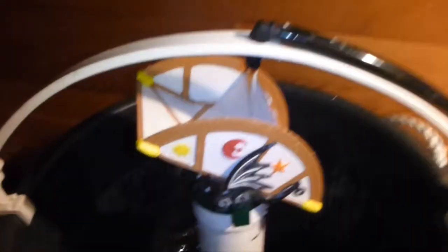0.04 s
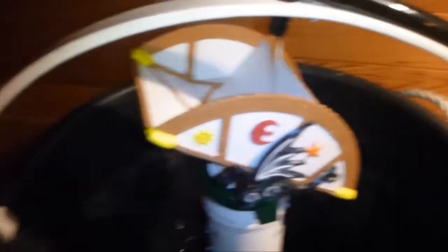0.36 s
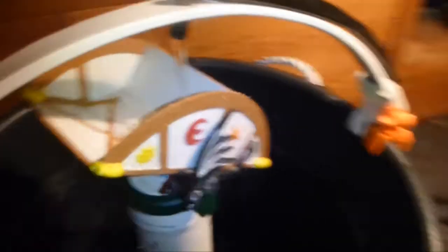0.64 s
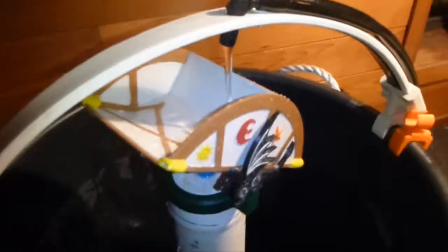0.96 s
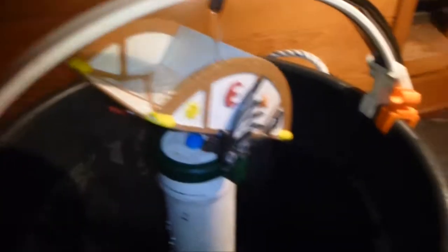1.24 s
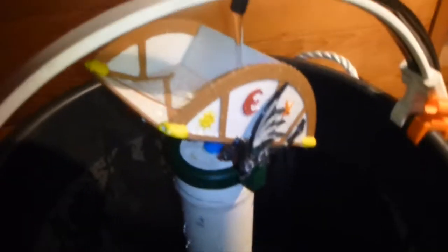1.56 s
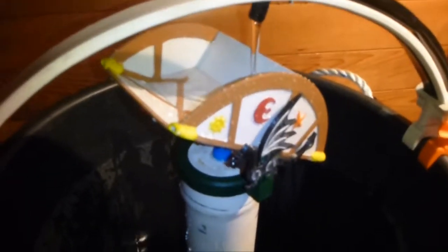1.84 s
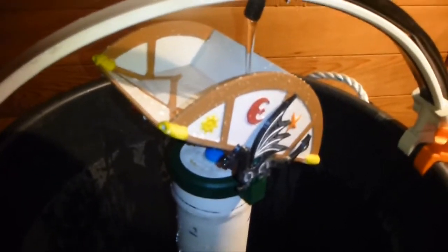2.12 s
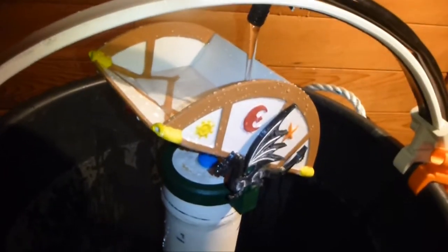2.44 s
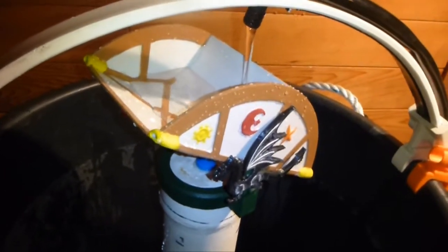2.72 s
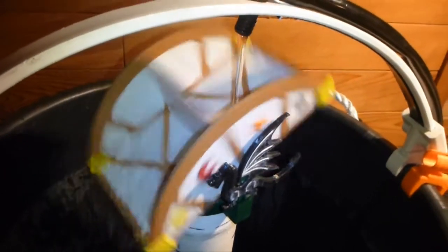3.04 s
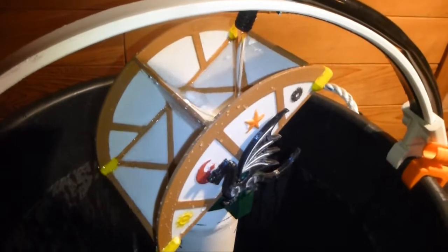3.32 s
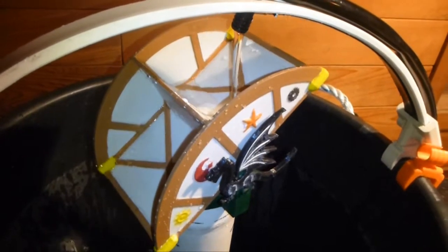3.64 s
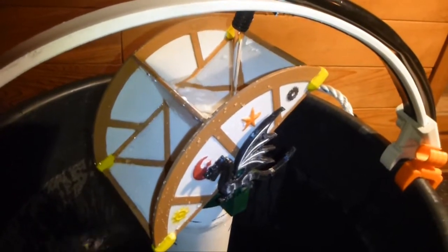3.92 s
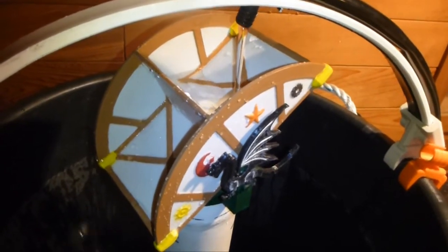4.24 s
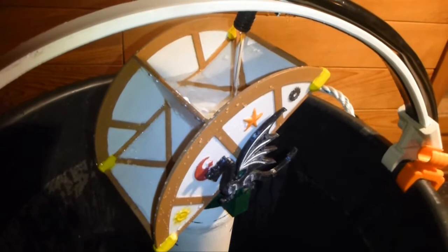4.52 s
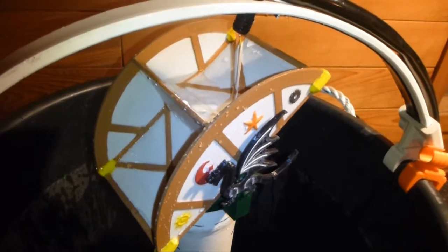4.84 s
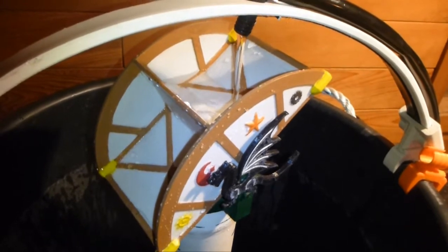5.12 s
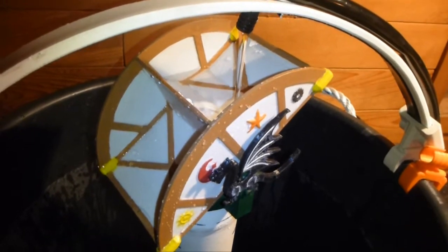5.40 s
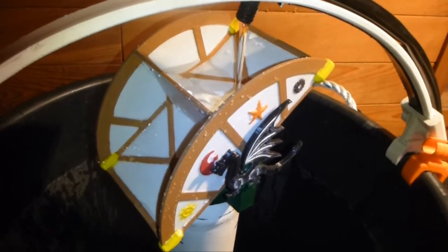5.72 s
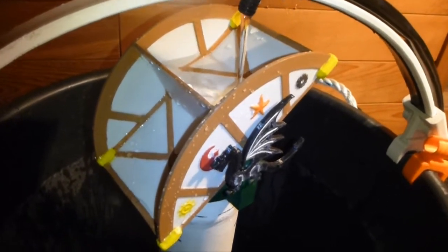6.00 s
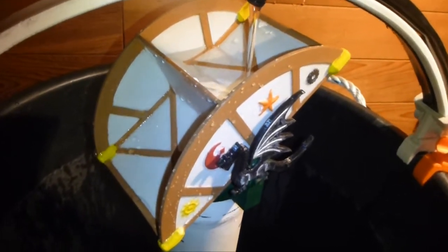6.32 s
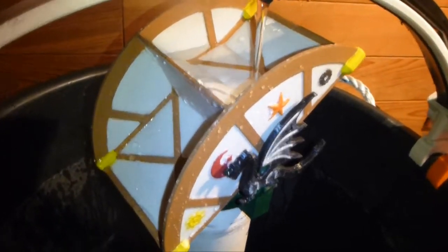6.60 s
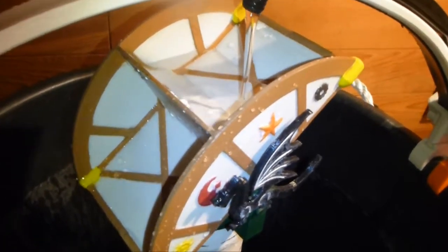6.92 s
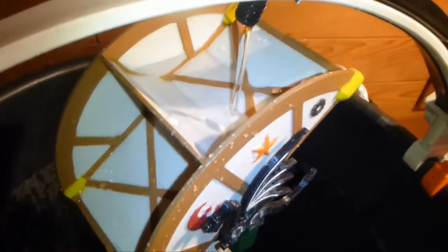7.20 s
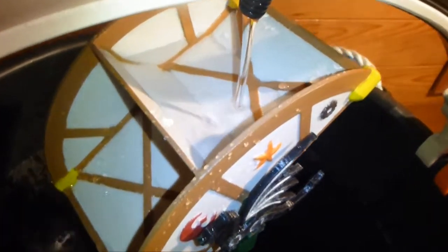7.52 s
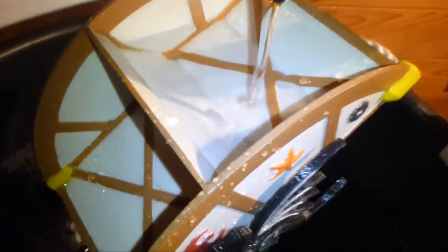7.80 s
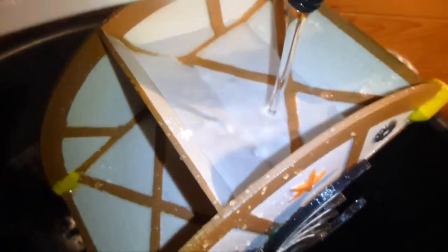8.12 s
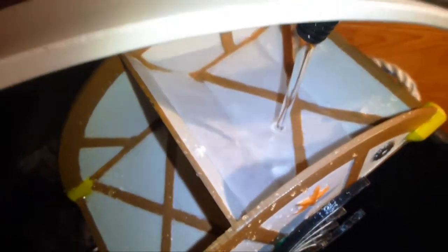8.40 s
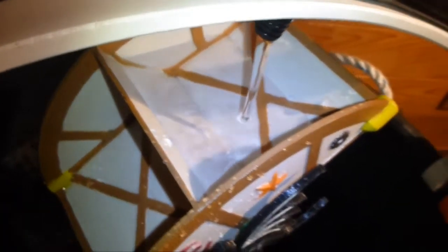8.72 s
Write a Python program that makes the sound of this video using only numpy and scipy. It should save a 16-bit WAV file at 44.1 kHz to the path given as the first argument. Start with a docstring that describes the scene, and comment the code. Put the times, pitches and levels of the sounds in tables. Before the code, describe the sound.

A steady, smooth hiss of room and microphone runs throughout. At about 0.8 seconds someone takes a soft step, and clothes rustle faintly until about 1.3 seconds. Two faint drips fall near 2 seconds. At about 3 seconds a plastic tipping bucket overbalances and hits its stop with one sharp clack, the loudest sound, with a very quick chatter and briefly ringing walls. The air in the big tub below gives a short, hollow boom at the same moment. From about 3.1 to 3.4 seconds the water plunges into the tub as a bright splash of spray and ringing bubbles. A few small drops and a fine patter follow, dying away by about 3.6 seconds. After that only the hiss remains until the end, near 9 seconds. Everything sounds close, with the short, dull reflections of a small wooden room.

```python
"""A steady, smooth hiss of room and microphone is heard first. Someone takes a step with a rustle of
clothes. At about 3 s a plastic tipping bucket above a big tub in a small wooden room overbalances and
clacks against its stop; its walls ring and the air in the tub booms. Its water plunges into the tub as
spray and ringing bubbles; a few drops follow."""
import sys
import numpy as np
from scipy import signal
from scipy.fft import rfft, irfft, next_fast_len
from scipy.io import wavfile
from scipy.ndimage import uniform_filter1d

SR = 44100
rng = np.random.default_rng(int(sys.argv[2]) if len(sys.argv) > 2 else 0)


def bounce(signal):
    """Save signal as a 16-bit WAV file at the path given by the first command-line argument."""
    frames = np.transpose(np.atleast_2d(signal))
    limited = np.clip(frames, -1, 1)
    pcm = np.round(limited * 32767).astype(np.int16)
    wavfile.write(sys.argv[1], SR, pcm)


N = 394694
TIME = np.arange(N) / SR
POUR_S = 3.231   # bulk of the water plunges in

# mid-pitched spectrum of the bubbles and the lead-in noise: (frequency [Hz], relative density [dB])
MID_SPECTRUM = [(100, -32), (200, -14), (380, -9), (550, -13), (900, 3.5), (1400, 2.5), (1850, 5.5),
                (2600, -5), (4500, -10), (9000, -45)]


def from_db(db):
    """Decibels to gain."""
    return 10 ** (np.asarray(db) / 20)


def rms_one(x):
    """Scale to unit rms."""
    return x / np.sqrt(np.mean(x ** 2) + 1e-20)


def coloured(x, spectrum):
    """Give a steady flat sound a spectrum; rms 1."""
    size = next_fast_len(N)
    hz, db = np.transpose(spectrum)
    bins_hz = np.maximum(np.arange(size // 2 + 1) * SR / size, 1)
    gain = from_db(np.interp(np.log(bins_hz), np.log(hz), db))
    gain /= 1 + (hz[0] / 2 / bins_hz) ** 2   # bass roll-off
    return rms_one(irfft(rfft(x, size) * gain, size)[:N])


def grains(per_s, spread_db):
    """Random tiny impacts of uneven size; rms 1."""
    sizes = from_db(spread_db * np.minimum(rng.exponential(1, N), 4)) * rng.choice([-1, 1], N)
    return rms_one(sizes * (rng.random(N) < per_s / SR))


def burst(start_s, rise_s, decay_s):
    """Envelope: linear rise to 1, exponential decay."""
    age = TIME - start_s
    return np.clip(age / rise_s, 0, 1) * np.exp(-np.clip((age - rise_s) / decay_s, 0, 20))


def swell(peak_s, rise_s, hold_s, decay_s):
    """Envelope: exponential rise to 1 at peak_s, hold, exponential decay."""
    age = TIME - peak_s
    return np.exp(-np.clip(np.maximum(-age / rise_s, (age - hold_s) / decay_s), 0, 20))


def around_clack():
    """Envelope: grows to 1 as the bucket hits its stop, then fades."""
    return swell(peak_s=3.056, rise_s=0.039, hold_s=0, decay_s=0.089)


def ring(x, hz, t60_s):
    """Resonator: a unit click rings as a sine of height 1."""
    radius, angle = np.exp(-np.log(1000) / (t60_s * SR)), 2 * np.pi * hz / SR
    return signal.lfilter([0, np.sin(angle)], [1, -2 * radius * np.cos(angle), radius ** 2], x + 1e-18)


def cloud(low_hz, high_hz, per_s, cycles, spread_db):
    """Many droplets or bubbles, each ringing briefly at one of 20 pitches; flat 2 s loop, rms 1."""
    pitches_hz = np.geomspace(low_hz, high_hz, num=20)
    hits = grains(per_s, spread_db)[:2 * SR]
    pitch_index = rng.integers(0, len(pitches_hz), 2 * SR)
    loop = sum(hz * ring(hits * (pitch_index == k), hz, cycles / hz) for k, hz in enumerate(pitches_hz))
    return np.resize(rms_one(loop), N)


def hiss(gain_db):
    """Steady, smooth noise of room and microphone."""
    # steady noise: (frequency [Hz], relative density [dB])
    spectrum = [(25, 7), (60, -10.5), (90, -12.5), (125, -6.5), (200, -3), (330, 2), (650, 1.5), (1000, -1),
                (2000, -6), (4000, -12), (7000, -17), (11000, -21), (15500, -23.5)]
    return from_db(gain_db) * coloured(rng.standard_normal(N), spectrum)


def room(x, t60_s, wet_db, cutoff_hz):
    """Add dense, dull reflections from the tub wall and the wooden room."""
    age = TIME[:SR // 2]
    tail = rng.standard_normal(len(age)) * np.exp(-np.log(1000) * age / t60_s) * (age > 0.003)
    tail = signal.sosfilt(signal.butter(1, cutoff_hz, fs=SR, output="sos"), tail)
    return x + from_db(wet_db) * signal.fftconvolve(x, tail / np.linalg.norm(tail))[:N]


def footsteps():
    """Heel and sole thud softly on the floor."""
    # footfalls: (time [s], level [dB])
    footfalls = [(.225, -40), (0.761, -31), (.789, -36.5)]
    # floor thud: (frequency [Hz], relative density [dB])
    spectrum = [(60, -22), (130, -1), (260, 2.5), (450, -2.5), (800, -3), (1400, -19), (6000, -45)]
    weight = sum(from_db(db) * burst(s, rise_s=0.0043, decay_s=0.016) for s, db in footfalls)
    return weight * coloured(rng.standard_normal(N), spectrum)


def clothes():
    """Cloth rustles as it slides on cloth and squeaks as it catches."""
    # catches: (time [s], pitch [Hz], level [dB], rise [s], decay [s])
    catches = [(.925, 4470, -35, 0.0075, .009), (1.172, 3710, -40, 0.03, 0.032)]
    # strokes, the first long and faint: (time [s], level [dB], hold [s])
    strokes = [(0, -57, 1.25), (.02, -49, .05), (.28, -49, .02), (.865, -40.5, .018), (.94, -37.5, 0.042),
               (1.185, -38.5, 0.046), (1.285, -47.5, .005)]
    # rustle: (frequency [Hz], relative density [dB])
    spectrum = [(400, -4), (1200, 0.5), (2400, -2.5), (3700, -1), (5000, -1.5), (7000, -7.5),
                (10000, -11.5), (15500, -20)]
    fibres = grains(per_s=15000, spread_db=3.5)
    squeaks = sum(from_db(db) * burst(s, rise_s, decay_s) * rms_one(ring(fibres, hz, t60_s=0.025))
                  for s, hz, db, rise_s, decay_s in catches)
    rub_power = sum((from_db(db) * swell(s, rise_s=0.026, hold_s=hold_s, decay_s=0.027)) ** 2
                    for s, db, hold_s in strokes)
    return squeaks + np.sqrt(rub_power) * coloured(fibres, spectrum)


def lead_in_noise(gain_db):
    """Faint mid-pitched noise swells just before the clack and fades after it."""
    return from_db(gain_db) * around_clack() * coloured(grains(per_s=2500, spread_db=6.0), MID_SPECTRUM)


def drops(attack_s, splat_decay_s, splat_cycles, glide_per_s):
    """Each drop lands with a brief splat and traps a bubble that rings and rises in pitch."""
    # single drops: (time [s], bubble pitch [Hz], bubble level [dB], t60 [s], splat level [dB])
    landings = [(1.904, 10300, -34, .025, -38), (2.014, 615, -41, .027, -32), (3.019, 1350, -34, .03, -39),
                (3.127, 1400, -21, .045, -24), (3.246, 386, -20.5, .07, -31), (3.299, 2730, -22, 0.03, -26),
                (3.3902, 1370, -20, 0.019, -39), (3.407, 796, -38, .12, -48), (3.410, 292, -37, .12, -48),
                (3.4780, 1678, -35.5, 0.16, -36)]
    out, age = np.zeros(N), TIME[:SR // 4]
    for s, hz, db, t60_s, splat_db in landings:
        envelope = from_db(db) * np.minimum(age / attack_s, 1) * np.exp(-np.log(1000) * age / t60_s)
        bubble = envelope * np.sin(2 * np.pi * hz * age * (1 + glide_per_s * age / 2))
        splat = rms_one(ring(rng.standard_normal(len(age)), hz, splat_cycles / hz))
        at = round(s * SR)
        out[at:at + len(age)] += bubble + from_db(splat_db) * splat * np.exp(-age / splat_decay_s)
    return out


def spatter(gain_db, flight_s, clump_decay_s, clumped_share):
    """Tiny droplets thrown up by the pour patter down in clumps after their flight."""
    # fine droplets: (frequency [Hz], relative density [dB])
    spectrum = [(3000, -20), (6500, 1), (9000, 0), (12000, -5), (15500, -6)]
    droplets = cloud(low_hz=5000, high_hz=15500, per_s=2500, cycles=40, spread_db=4.0)
    landings = np.abs(grains(per_s=70, spread_db=0.5))
    clumps = rms_one(signal.lfilter([1], [1, -np.exp(-1 / (clump_decay_s * SR))], landings + 1e-18))
    patter = np.sqrt(1 - clumped_share + clumped_share * clumps ** 2)
    shower = swell(POUR_S + flight_s, rise_s=0.03, hold_s=0.055, decay_s=0.048)
    return from_db(gain_db) * shower * patter * coloured(droplets, spectrum)


def splash(pour_spray_db, pour_bubbles_db, slap_bubbles_db):
    """Slapping sheets of water burst mostly into spray; the pour behind mostly drives bubbles under."""
    # sheets of water landing: (time [s], level [dB])
    sheets = [(3.138, -24), (3.147, -20), (3.1943, -17), (3.256, -25), (3.323, -33.5)]
    # spray: (frequency [Hz], relative density [dB])
    spray_spectrum = [(400, -27), (1200, -13), (2600, -5), (4500, -1.5), (7000, -4.5), (9000, -7),
                      (12000, -11.5), (15500, -14)]
    spray = cloud(low_hz=1200, high_hz=15700, per_s=14000, cycles=12, spread_db=3.0)
    bubbles = cloud(low_hz=343, high_hz=3480, per_s=4000, cycles=24, spread_db=0.5)
    slaps = np.sqrt(sum((from_db(db) * burst(s, rise_s=0.0022, decay_s=0.021)) ** 2 for s, db in sheets))
    pour = swell(POUR_S, rise_s=0.025, hold_s=0.031, decay_s=0.026)
    spraying = np.hypot(slaps, from_db(pour_spray_db) * pour)
    churning = np.hypot(from_db(slap_bubbles_db) * slaps, from_db(pour_bubbles_db) * pour)
    return spraying * coloured(spray, spray_spectrum) + churning * coloured(bubbles, MID_SPECTRUM)


def boom(hz, rise_s, blow_s, blow_db, rebound_s, rebound_db, hum_db, slosh_db):
    """Air in the tub swells at its own pitch after blow and rebound and hums on; moving water stirs it."""
    progress = np.clip((TIME - [[blow_s], [rebound_s]]) / rise_s, 0, 20)
    push = from_db([blow_db, rebound_db]) @ (progress * np.exp(1 - progress)) ** 3
    hum = from_db(hum_db) * burst(blow_s, rise_s, decay_s=0.045)
    tone = np.sin(2 * np.pi * hz * (TIME - blow_s))
    slosh = rms_one(ring(rng.standard_normal(N), hz, t60_s=0.11))
    slosh = signal.sosfilt(signal.butter(2, 200, "high", fs=SR, output="sos"), slosh)
    return (push + hum) * tone + from_db(slosh_db) * around_clack() * slosh


def clack(ring_db, crack_db, hardening, buzz_db):
    """The bucket chatters on its stop: a crack that favours hard blows, ringing walls, a dying buzz."""
    # graze, hit and bounces: (time [s], strength [dB])
    knocks = [(3.054, -24), (3.0555, 0.5), (3.0582, -11.5), (3.0655, -19), (3.0785, -24), (3.0885, -19)]
    # plastic wall modes: (frequency [Hz], relative level [dB], t60 [s])
    modes = [(398, -24, .15), (924, -19, .14), (1110, -17, .11), (1302, -16, .08), (1410, -20, .13),
             (1726, -23, .1), (1939, -14, .14), (1978, -15, .08), (2216, -17, .12), (2386, -13, .07),
             (2500, -13, .07), (2605, -14, .07), (2795, -15, .05), (2924, -14, .11), (3200, -18, .11),
             (3435, -17, .04), (3790, -23, .07), (4010, -25, .09), (4310, -23, .09), (4510, -25, .08),
             (4780, -24, .07), (5066, -24, .06), (6300, -15, .03)]
    # contact noise: (frequency [Hz], relative density [dB])
    spectrum = [(60, -26), (250, -15), (480, -16), (700, -16), (1200, -1), (1600, -7.5), (2600, 7),
                (4000, -7.5), (6300, -13), (9000, -22), (15500, -31)]
    clicks, crack = np.zeros(N), np.zeros(N)
    for s, db in knocks:
        clicks[round(s * SR)] += from_db(db)
        crack += from_db(crack_db + hardening * db) * burst(s, rise_s=0.0003, decay_s=0.0018)
    walls = sum((-1) ** k * from_db(db + ring_db) * ring(clicks, hz, t60_s)
                for k, (hz, db, t60_s) in enumerate(modes))
    buzz = from_db(buzz_db) * burst(knocks[0][0], rise_s=0.0022, decay_s=0.021)
    return walls + (crack + buzz) * coloured(rng.standard_normal(N), spectrum)


def gain_control(x, threshold_db, max_cut_db, recovery_db_per_s):
    """Loud sound turns the gain down a little; it creeps back up."""
    level_db = 10 * np.log10(np.maximum(uniform_filter1d(x ** 2, size=441), 1e-12))
    demand_db = np.clip(level_db - threshold_db, 0, max_cut_db)
    creep_db = recovery_db_per_s * TIME
    cut_db = np.maximum.accumulate(demand_db + creep_db) - creep_db
    return x * from_db(-cut_db)


def scene():
    """Bucket and water with their reflections, plus tub boom, hiss, step and clothes; mono."""
    bucket = clack(ring_db=-1.3, crack_db=3.0, hardening=1.25, buzz_db=-17) + lead_in_noise(gain_db=-36.5)
    water = splash(pour_spray_db=-25.0, pour_bubbles_db=-23.0, slap_bubbles_db=-12)
    water += spatter(gain_db=-49.5, flight_s=0.195, clump_decay_s=0.005, clumped_share=0.79)
    water += drops(attack_s=0.0017, splat_decay_s=0.0025, splat_cycles=9.6, glide_per_s=1.73)
    tub = boom(hz=327.3, rise_s=0.014, blow_s=3.0575, blow_db=-12.0,
               rebound_s=3.072, rebound_db=-20.5, hum_db=-21, slosh_db=-30)
    tipping = room(bucket + water, t60_s=0.24, wet_db=-15.0, cutoff_hz=7000)
    return (tipping + tub + hiss(gain_db=-42.5) + footsteps() + clothes())[None]


def record(dry):
    """Narrow treble dip, gain riding, overload at full scale, bass cut, top cut."""
    notch_hz, low_cut_hz, high_cut_hz = 5780, 110, 15800
    dipped = signal.lfilter(*signal.iirnotch(notch_hz, Q=11.0, fs=SR), dry)
    ridden = gain_control(dipped, threshold_db=-30, max_cut_db=2.0, recovery_db_per_s=1.6)
    clipped = np.clip(ridden, -1, 1)
    thinned = signal.sosfilt(signal.butter(2, low_cut_hz, "high", fs=SR, output="sos"), clipped)
    return signal.sosfilt(signal.ellip(12, 0.1, 70, high_cut_hz, fs=SR, output="sos"), thinned)


dry = scene()
out = record(dry)
bounce(out)
```